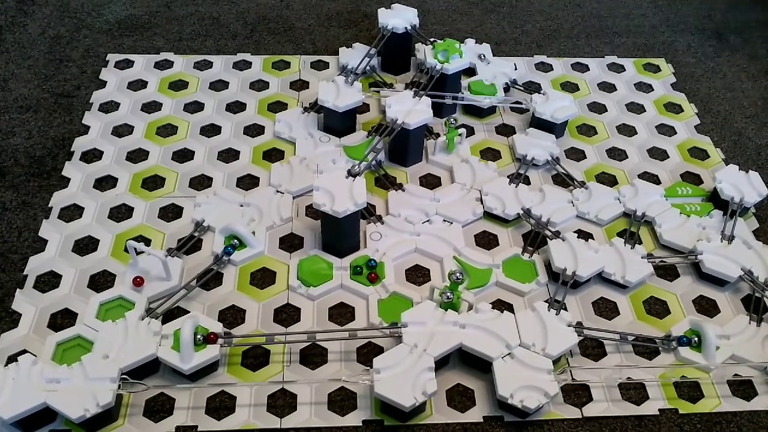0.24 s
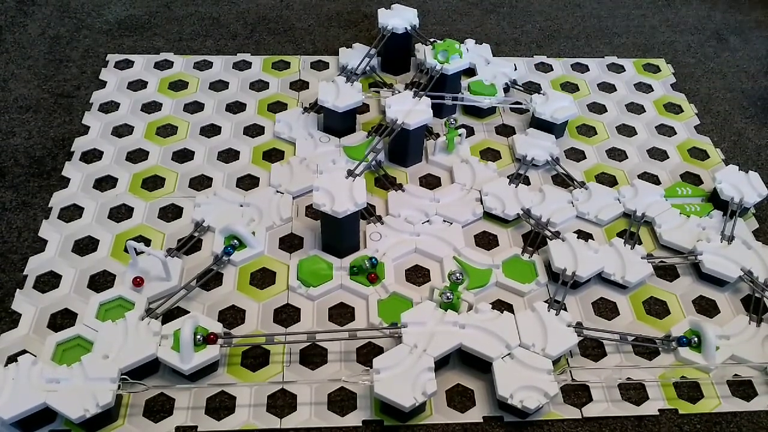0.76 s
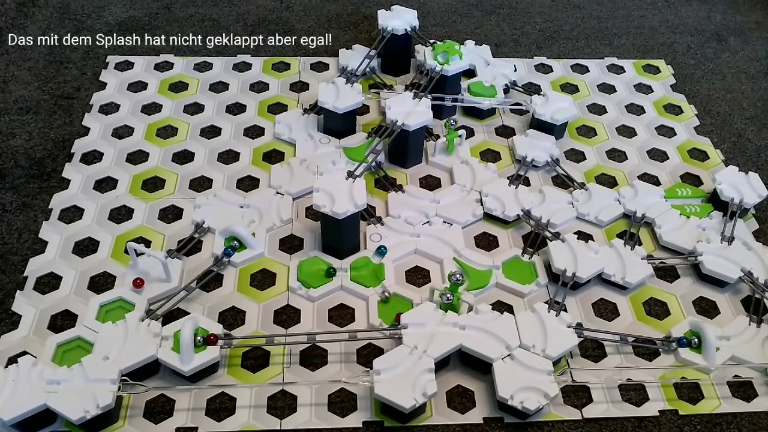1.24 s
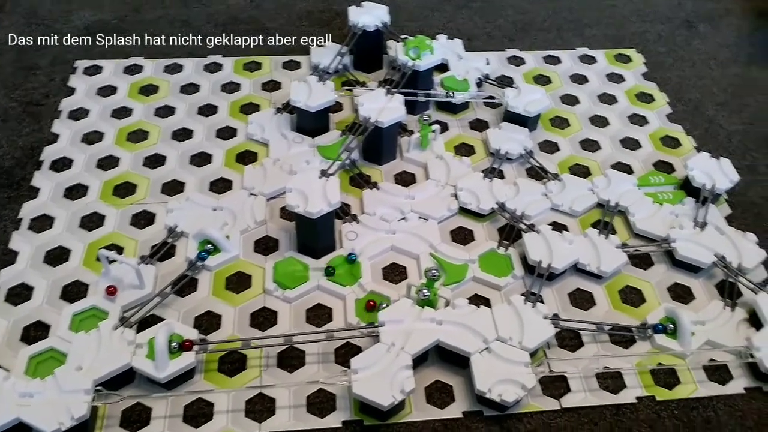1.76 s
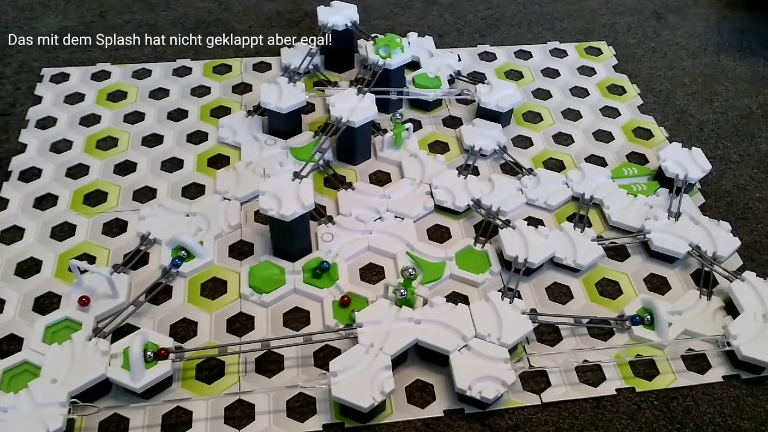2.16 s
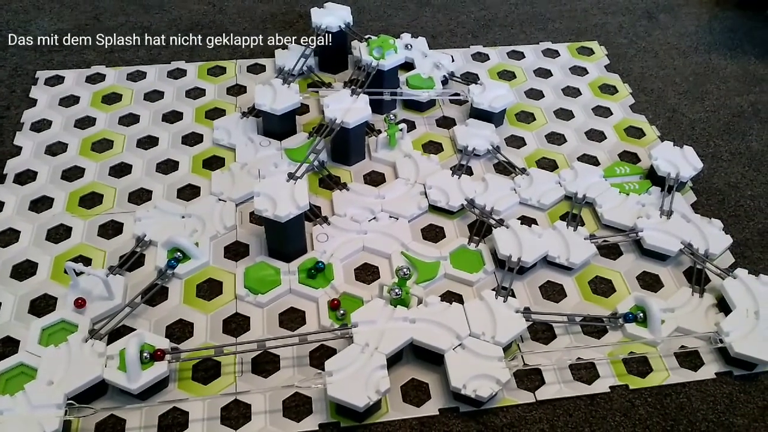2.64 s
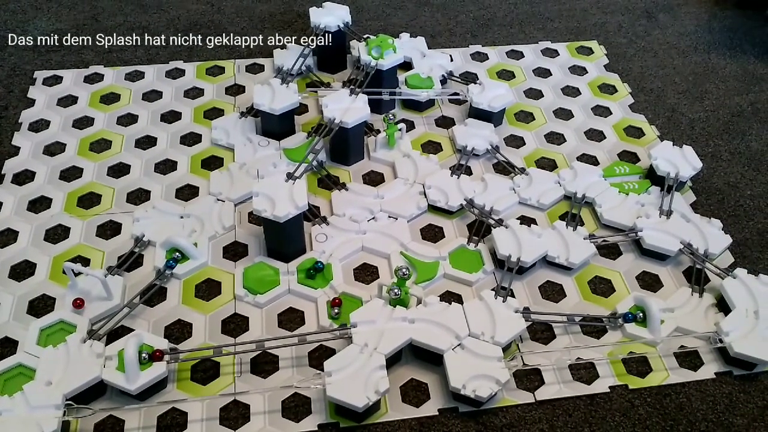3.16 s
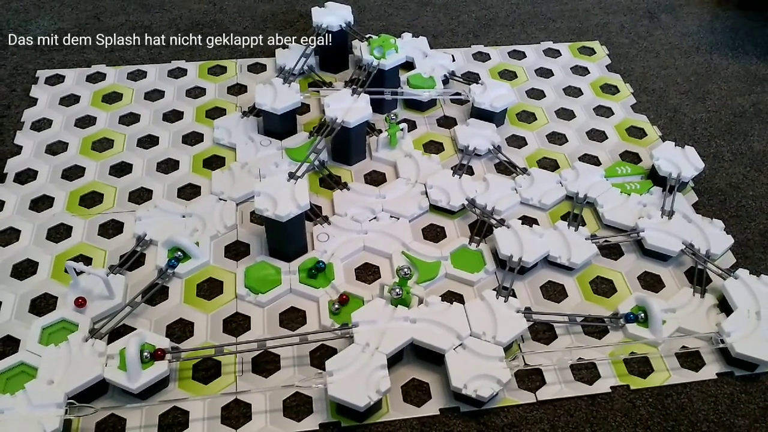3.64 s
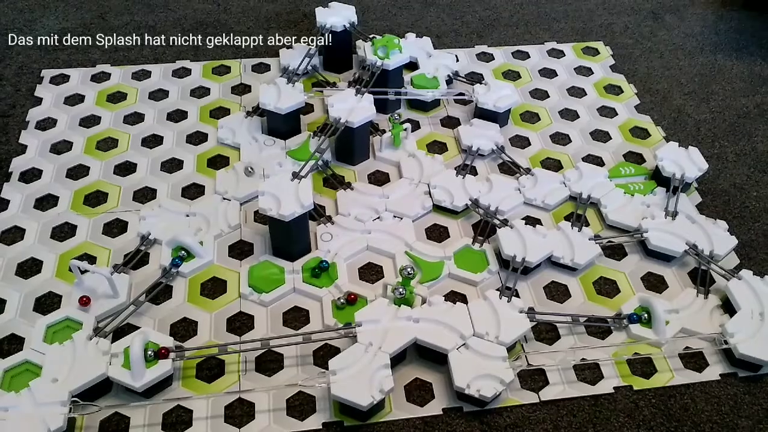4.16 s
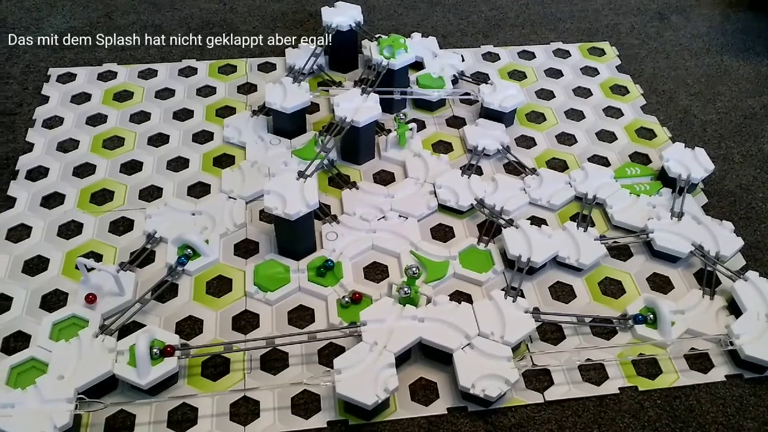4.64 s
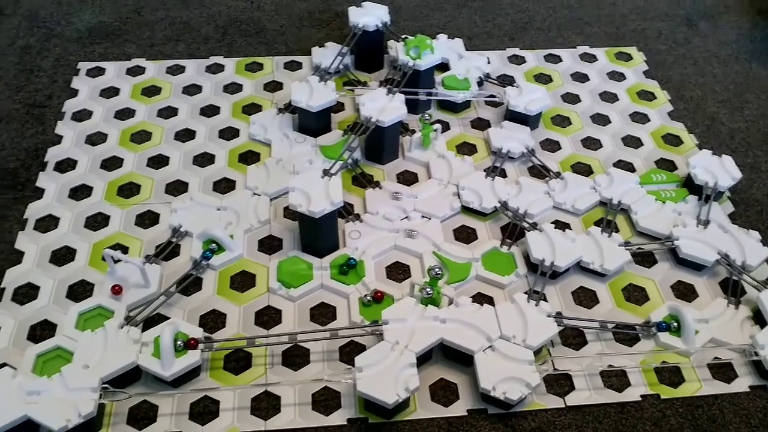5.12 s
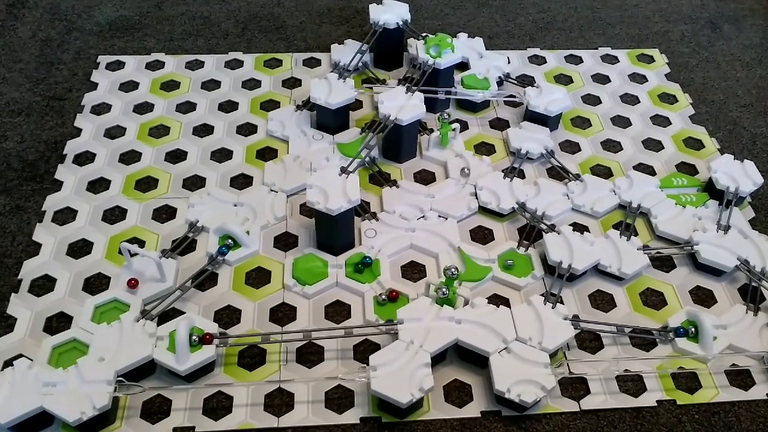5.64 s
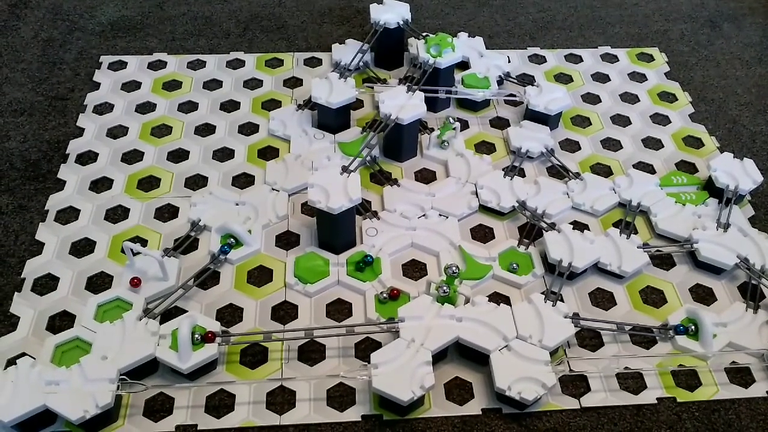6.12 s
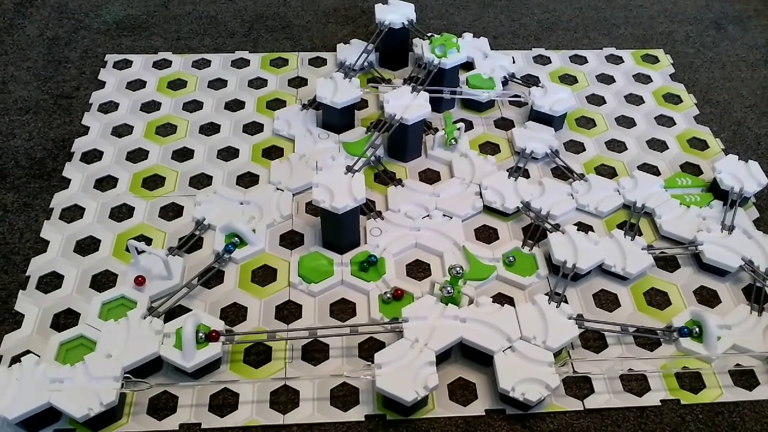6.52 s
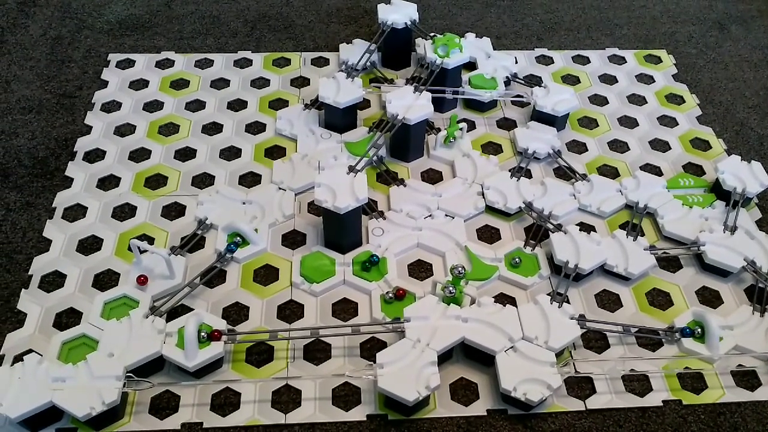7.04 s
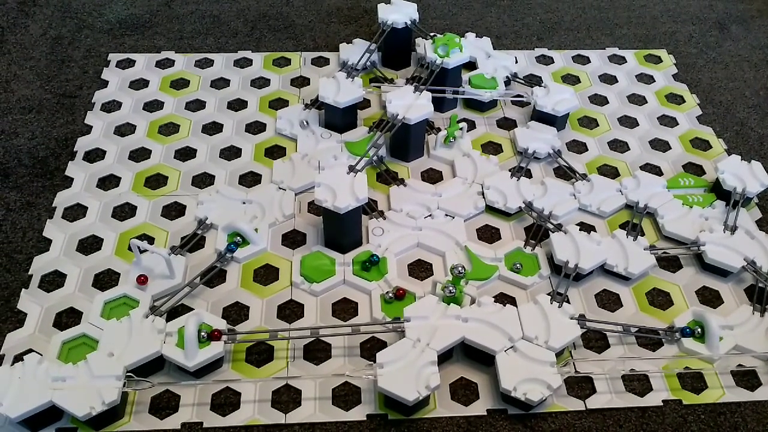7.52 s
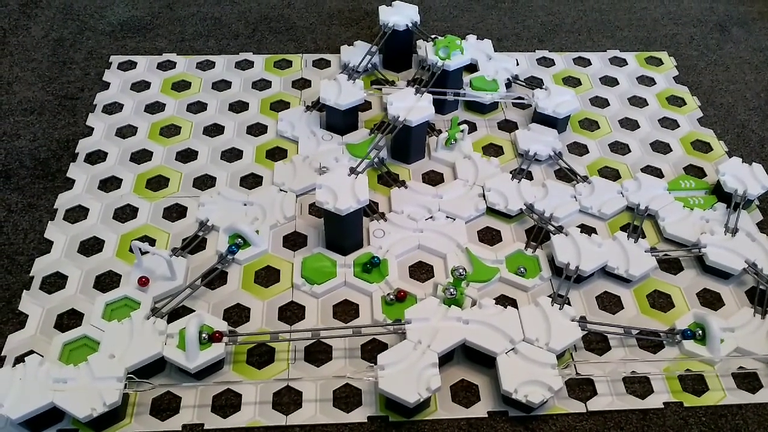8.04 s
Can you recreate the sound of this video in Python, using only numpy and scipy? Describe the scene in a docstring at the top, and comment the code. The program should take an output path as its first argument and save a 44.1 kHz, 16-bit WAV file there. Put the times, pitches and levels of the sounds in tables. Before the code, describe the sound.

Small steel marbles clack, tick and rattle through a hard plastic track on a carpeted floor, with short gaps and a few loud knocks.

```python
"""On a carpeted floor, steel marbles run through a plastic tile-and-rail track.
Knocks on joints and catchers are short contact bursts driving decaying modes; soft pushes thump the base.
Rolling is random ticks, a few pieces hum from noise, and a small pivot squeaks as wavering sines.
The room answers with echoes and a tail. It is heard through a phone, whose noise suppressor cuts
quiet tails short, over filtered noise for the low room rumble and faint hiss."""
import sys
import numpy as np
from scipy import signal
from scipy.fft import rfft, irfft, next_fast_len
from scipy.io import wavfile
from scipy.ndimage import uniform_filter1d

SR = 44100
rng = np.random.default_rng(int(sys.argv[2]) if len(sys.argv) > 2 else 0)


def undo_db(level):
    """Turn decibels back into plain size, where 20 dB means ten times bigger."""
    steps = np.asarray(level, float) / 20
    return 10 ** steps


def file_out(sig):
    """Save sig as 16-bit WAV at sys.argv[1]."""
    # one column per channel
    cols = np.atleast_2d(sig).T
    # limit, then scale
    lim = np.clip(cols, -1, 1)
    pcm = np.round(lim * 32767).astype(np.int16)
    wavfile.write(sys.argv[1], SR, pcm)


N = 365148

# modes of the hollow base plate: f/Hz, t60/s when struck, relative level/dB
BASE_MODES = [(250, 0.012, -3), (330, 0.00077, -2), (532, 0.022, -3.5), (587, 0.017, 3.5),
              (761.6, 0.016, 5.5), (970, 0.025, -2.5)]
# modes of the plastic tiles: f/Hz, t60/s when struck, relative level/dB
TILE_MODES = [(1370, 0.0047, -2), (1484, 0.003, 2.5), (1637, 0.0088, -3), (1920, 0.0042, -6.5),
              (1967, 0.014, -10.5)]
# modes of the rails: f/Hz, t60/s when struck, relative level/dB
RAIL_MODES = [(2650, 0.0024, -9.5), (3240, 0.007, -13.5), (3500, .006, -15), (4360, 0.0039, -6.5),
              (5100, 0.0022, -1), (6200, 0.0035, -10.5), (6450, 0.0062, -11)]
# bright steel ticks: f/Hz, t60/s when struck, relative level/dB
STEEL_MODES = [(7560, 0.0019, 9), (10160, 0.00082, 10), (11770, 0.00094, 9), (12600, 0.004, -1.5),
               (14300, 0.003, -2.5)]


def rms_one(x):
    """Scale to unit rms."""
    return x / np.sqrt(np.mean(x ** 2) + 1e-20)


def at_hz(points, hz):
    """Read a table on a log-frequency axis."""
    table_hz, value = np.transpose(points)
    return np.interp(np.log(hz), np.log(table_hz), value)


def ring(force, hz, t60):
    """A force sets a decaying sine ringing; small parts radiate nothing far below their pitch."""
    r, w = undo_db(-60 / (t60 * SR)), 2 * np.pi * hz / SR
    return signal.lfilter([.5, 0, -.5], [1, -2 * r * np.cos(w), r * r], force + 1e-18)


def drift(rate_hz):
    """Slow chance with spread 1: smoothed noise on 40 knots per second."""
    knots = rng.standard_normal(int(N / SR * 40) + 2)
    r = np.exp(-2 * np.pi * rate_hz / 40)
    smooth = rms_one(signal.lfilter([1], [1, -r], knots))
    return np.interp(np.arange(N) / SR * 40, np.arange(len(knots)), smooth)


def glide(x, depth, rate_hz):
    """Pitches waver slowly by the share depth, as the marble moves along a piece."""
    at = np.arange(N) + np.cumsum(depth * drift(rate_hz))
    return np.interp(at % (N - 1), np.arange(N), x)


def swell(start, length):
    """Rounded rise and fall, silent outside its span in seconds."""
    t = np.arange(N) / SR
    return np.sin(np.pi * np.clip((t - start) / length, 0, 1)) ** .5


def knocks():
    """Snap and chatter of contacts drive the modes, hardest near the brightest ring; returns direct, diffuse."""
    # knocks: t/s, drive level/dB, tile share/dB, brightest ring f/Hz, steel share/dB
    hits = [(0.08,-52.5,-11,3340,-9),(0.294,-43,-7,8510,-9),(.322,-39,-18,11400,-6.5),(0.334,-32.5,-4,7530,-49),(0.41,-35.5,-2.5,4350,-8.5),(.841,-13,-7,2800,-8),(0.872,-23,-8.5,3420,-14),(.906,-18.5,-17,2720,-19),(1.06,-51,-6,5570,-19),(1.085,-53,-6,2900,-26),(1.149,-39,-6,2680,-17),(1.289,-42.5,-14,2860,-13.5),(1.311,-32.5,-16.5,3000,-39),(1.355,-41,-29,2560,-16),(1.411,-36.5,-10.5,2615,-18),(1.45,-50.5,-47,10200,-3),(1.571,-49,-6,2540,-32.5),(1.683,-46,-18,2560,-62),(1.737,-46.5,-14,2510,-60),(1.864,-48.5,-11,2760,-59),(2.04,-40,-10,2207,-12.5),(2.317,-38,-10,9140,-7.5),(2.5,-50,-6,5600,-3),(2.575,-52,-22,5600,-3.5),(2.625,-49.5,-23,5760,-6.5),(2.674,-32.5,-6.5,5840,-15),(2.787,-41.5,4,2900,-9),(2.803,-40,-18,5070,-27),(2.816,-36,-27.5,8900,-5.5),(3.252,-51,-2.5,3900,-12.5),(3.343,-56.5,0,4900,-5.5),(3.434,-42.5,-8,7000,-17),(3.47,-23.5,-8.5,3720,-27),(3.629,-41,-4.5,8000,-16.5),(3.687,-48,-8.5,4800,-13),(3.814,-35,-8,6360,-14),(3.896,-40,-3,2520,-8.5),(3.936,-37.5,-3.5,6000,-12.5),(4.153,-54.5,6,2570,-35),(4.304,-25,-13,3560,-24),(4.477,-46.5,0,5000,-11),(4.602,-54.5,-5,5200,-6.5),(4.674,-41.5,-3.5,5350,-9),(4.765,-35.5,-41,5940,-16),(4.799,-37.5,-7,2570,-11.5),(4.9,-37.5,-42,2990,-17),(5.08,-32.5,-17,2680,-18),(5.117,-28,-19.5,2850,-64),(5.146,-31,-32,2880,-21.5),(5.318,-28.5,-5.5,2820,-22),(5.37,-40.5,-10,6500,-15.5),(5.501,-36.5,-6,6250,-57),(5.575,-41.5,-4,2830,-18),(5.698,-31.5,-10,2870,-20),(5.831,-37,-16,2820,-10),(5.848,-30,-11.5,3240,-69),(5.888,-38.5,-31,2850,-19),(5.971,-15,-21,3610,-24),(6.029,-50,-30,7800,-8.5),(6.168,-46,-15.5,2790,-48),(6.285,-45,-1.5,6620,-18),(6.318,-14,-12.5,3680,-14.5),(6.448,-34.5,-9.5,3430,-14),(6.479,-29,-15,3190,-18.5),(6.519,-33.5,-7,3240,-25),(6.648,-54,5.5,6000,-49),(6.676,-39.5,-37,6450,-40),(6.746,-41,-3.5,3700,-24),(6.801,-39.5,-36,4050,-26),(6.823,-37.5,-15,3710,-30),(6.906,-47,-1,3320,-33),(7.027,-41,-15,4160,-29),(7.11,-44.5,-15.5,3450,-13.5),(7.408,-49,-15,4640,-35),(7.475,-42.5,-25.5,3505,-39),(7.655,-50.5,6,5700,-35),(7.854,-43,2.5,2810,-42),(7.915,-45.5,-13.5,3230,-21.5),(8.086,-64,10.5,4540,-58)]
    rise_s, chatter_s, settle_s, snap = 0.00059, 0.0018, 0.006, 2.2
    s, drive_db, tile_db, bright_hz, steel_db = np.transpose(hits)
    # the duller a knock, the more it drives the hollow base; the heaviest blows shake it more still
    base_db = np.maximum(-21 - 27.5 * np.log2(bright_hz / 2290), -35)
    base_db = base_db + 3.9 * np.maximum(drive_db + 15.5, 0)
    modes = BASE_MODES + TILE_MODES + RAIL_MODES + STEEL_MODES
    chance_db = rng.normal(0, 1.5, (len(s), len(modes)))

    steps = np.arange(600)
    contact = np.exp(-steps / (chatter_s * SR)) * (1 - np.exp(-(steps / (rise_s * SR)) ** 2))
    chatter = rng.standard_normal((len(s), len(modes), len(steps))) * contact
    chatter /= np.sqrt(np.sum(chatter ** 2, axis=2, keepdims=True))
    chatter[:, :, np.argmax(contact)] += snap * (-1) ** np.arange(len(modes))
    chatter *= 1.95 / np.hypot(1, snap)
    # toward the walls the whole loose track radiates, rattling a little longer
    settle = rng.standard_normal(chatter.shape) * np.exp(-steps / (settle_s * SR))
    settle *= 1.526 / np.sqrt(np.sum(settle ** 2, axis=2, keepdims=True))

    at = np.minimum((s * SR).astype(int)[:, None] + steps, N - 1)
    shares = [base_db] * len(BASE_MODES) + [tile_db] * len(TILE_MODES)
    shares += [0 * s] * len(RAIL_MODES) + [steel_db] * len(STEEL_MODES)
    # weak knocks are far away: more room against direct sound
    to_room = undo_db(0.17 * (drive_db.max() - drive_db))[:, None]
    out = np.zeros((2, N))
    for k, (hz, t60, level_db) in enumerate(modes):
        octaves = np.log2(hz / bright_hz)
        near_db = 5.5 * np.exp(-(octaves / 0.21) ** 2)
        if (hz, t60, level_db) in RAIL_MODES:  # a dull knock loses rail modes above its brightest ring
            near_db = near_db + 0.84 * np.minimum(steel_db + 6.5, 0) * np.clip(octaves, 0, 1)
        push = undo_db(drive_db + shares[k] + level_db + near_db + chance_db[:, k])[:, None]
        force = np.zeros((2, N))
        np.add.at(force[0], at, push * chatter[:, k])
        np.add.at(force[1], at, push * settle[:, k] * to_room)
        out += ring(force, hz, t60)

    # each struck piece also rings at its brightest pitch, losing 60 dB in 80 cycles
    t = np.arange(SR // 20) / SR
    pitch = bright_hz[:, None]
    own_db = np.minimum(drive_db, -21.5)[:, None] - 10  # harder blows add clatter, not ring
    own = undo_db(own_db - 60 * t * pitch / 80) * np.sin(2 * np.pi * pitch * t) * (1 - np.exp(-t / rise_s))
    at = np.minimum(at[:, :1] + np.arange(len(t)), N - 1)
    np.add.at(out[0], at, own)
    np.add.at(out[1], at, own)
    return out


def thuds():
    """A soft push sets the base plate or a tile thumping."""
    # thumps: t/s, drive level/dB, f/Hz
    thumps = [(0.332,-30.5,1800),(0.409,-34.5,1774),(0.62,-46.5,1550),(0.843,-36.5,222),(0.906,-27.5,557),(1.06,-35.5,322),(1.15,-39.5,518),(1.413,-40,550),(1.572,-52.5,602),(1.748,-41,292),(1.8,-52.5,585),(2.05,-45,625),(3.127,-49.5,1280),(3.964,-41,1800),(5.999,-43.5,388),(5.18,-45,288),(5.7,-42,512),(6.283,-36.5,325),(6.289,-34.5,627),(6.318,-36.5,328)]
    t60, push_s = 0.03, 0.005
    out, steps = np.zeros(N), np.arange(int(push_s * SR))
    for s, drive_db, hz in thumps:
        force = np.zeros(N)
        push = np.sin(2 * np.pi * hz * steps / SR) * np.hanning(len(steps))
        force[int(s * SR) + steps] = undo_db(drive_db) * push
        out += ring(force, hz, t60) * 2.8 / len(steps)
    return out


def run_levels():
    """Each run swells, sinks a little as the marble slows and dies away; gains for tile, base and rail."""
    # runs over track: start t/s, length/s, relative tile rattle/dB, base drone/dB, rail hiss/dB
    runs = [(0,0.02,-52.5,-70.5,-50),(0.106,0.099,-66,-87,-68),(0.251,0.34,-58,-71.5,-60.5),(0.857,0.16,-55,-71,-55.5),(1.155,0.25,-92,-62.5,-82),(1.697,0.36,-71,-72,-70),(2.334,0.042,-53.5,-90,-58),(2.42,0.4,-58.5,-87,-63.5),(2.9,0.38,-69.5,-76,-78),(3.359,1,-57,-82,-57),(3.839,0.29,-54.5,-59,-87),(4.149,0.9,-55,-69,-58),(4.674,0.1,-52,-56,-57),(4.963,0.074,-55,-54,-60.5),(5.127,0.15,-51.5,-54,-70.5),(5.397,0.093,-60.5,-55.5,-78),(5.681,0.21,-82,-59,-85),(6.34,0.27,-55,-69,-57.5),(6.627,0.34,-54.5,-88,-59),(7.497,0.42,-57,-60,-68),(8.097,0.16,-71,-78.5,-93)]
    rise, slowing, fall = 461, 2, 217  # dB per s
    start, length, *levels_db = np.transpose(runs)[:, :, None]
    t = np.arange(0, N + 64, 64) / SR
    since = t - start
    shape_db = rise * np.minimum(since, 0) - slowing * np.maximum(since, 0)
    shape_db = shape_db - fall * np.maximum(since - length, 0)
    gains = []
    for db in levels_db:
        total = np.sqrt(np.sum(undo_db(2 * (db + shape_db)), axis=0))
        gains.append(np.interp(np.arange(N) / SR, t, total))
    return gains


def rolling():
    """Roughness under the marbles: clumped ticks into the track's modes, which change from tile to tile."""
    tile, base, rail = run_levels()
    chance = 750 * undo_db(3.5 * drift(8.3)) / SR  # about 750 ticks per s, in clumps
    parts = ((TILE_MODES, tile), (BASE_MODES[2:], base), (RAIL_MODES, rail),
             (STEEL_MODES, rail * undo_db(-11.0)))
    out = 0
    for modes, level in parts:
        size_db = 5.3 * np.minimum(rng.exponential(1, N), 4)
        ticks = (rng.random(N) < chance) * undo_db(size_db) * rng.choice([-1, 1], N)
        part = 0
        for k, (hz, t60, db) in enumerate(modes):
            # slow contacts excite the lower modes of each part most
            mode_db = db - 8.5 * np.log2(hz / modes[0][0]) + 5 * drift(9.4)
            tone = glide(ring(ticks, hz, t60 * 1.3), depth=.08, rate_hz=2.5)
            part = part + undo_db(mode_db) * tone * (-1) ** k
        out = out + level * rms_one(part)
    return undo_db(-7.5) * out


def hums():
    """Fine roughness under a slow marble drives a single mode: a narrow, unsteady tone."""
    # humming pieces: start t/s, length/s, f/Hz, level/dB
    tones = [(0.203,0.35,1734,-62.5),(0.422,0.36,1455,-71),(3.048,0.25,1350,-73.5),(3.092,0.31,4130,-83),(7.646,0.11,5480,-79),(8.068,0.092,4720,-76),(8.077,0.29,2950,-79.5),(8.142,0.18,1314,-65.5),(8.169,0.17,655,-76)]
    out = 0
    for start, length, hz, level_db in tones:
        tone = rms_one(ring(rng.standard_normal(N), hz, t60=.028))
        out = out + undo_db(level_db) * swell(start, length) * tone
    return out


def squeaks():
    """Stick-slip in a pivot: a wavering tone with its octave."""
    # squeaks: start t/s, length/s, f/Hz, pitch waver/Hz, level/dB, octave's relative level/dB
    chirps = [(2.498, 0.044, 5600, 250, -62, -27.5), (2.563, 0.2, 5700, 250, -64, -20),
              (6.279, 0.046, 6730, 250, -47.5, -8.5), (6.645, 0.021, 6460, 31.1, -49, -27)]
    out, waver = 0, rms_one(uniform_filter1d(rng.standard_normal(N), size=30))
    for start, length, hz, waver_hz, level_db, octave_db in chirps:
        phase = 2 * np.pi * np.cumsum(hz + waver_hz * waver) / SR
        tone = np.sin(phase) + undo_db(octave_db) * np.sin(2 * phase)
        out = out + undo_db(level_db) * swell(start, length) * tone
    return out


def room(direct, diffuse):
    """A few distinct reflections, then a diffuse tail that dies band by band."""
    # room decay: f/Hz, t60/s
    decay = [(200, 0.93), (530, 0.57), (1400, 0.4), (3700, 0.38), (9700, 0.29), (15000, 0.36)]
    # first reflections: delay/s, level/dB
    reflections = [(0.0112, -14), (0.016, -13.5), (0.0226, -17)]
    t = np.arange(SR // 2) / SR
    edges, reply = 100 * 2 ** np.arange(0, 7.6, .5), 0
    for low, high in zip(edges, edges[1:]):
        half_octave = signal.butter(2, [low, high], "band", fs=SR, output="sos")
        band = signal.sosfilt(half_octave, rng.standard_normal(len(t)))
        reply = reply + band * undo_db(-60 * t / at_hz(decay, np.sqrt(low * high)))
    reply = reply * (1 - np.exp(-(t / 0.0029) ** 2))  # the tail builds up over about 3 ms
    reply = undo_db(-3.5) * reply / np.sqrt(np.sum(reply ** 2))
    echoes = sum(undo_db(db) * np.roll(direct, round(delay * SR)) for delay, db in reflections)
    return echoes + signal.fftconvolve(diffuse, reply)[:N]


def air():
    """Noise coloured as room rumble and microphone hiss; it wanders in level, its upper rumble more."""
    # noise colour: f/Hz, relative level/dB
    colour = [(15, -60), (35, -20.5), (60, -1), (110, 2), (170, 0), (300, -7), (420, -30.5), (700, -37),
              (8000, -41), (10000, -54), (15000, -57.5)]
    size = next_fast_len(N)
    hz = np.maximum(np.fft.rfftfreq(size, 1 / SR), 1)
    spectrum = rfft(rng.standard_normal(size)) * undo_db(at_hz(colour, hz))
    steady = rms_one(irfft(spectrum, size)[:N])
    upper_band = signal.butter(2, [200, 500], "band", fs=SR, output="sos")
    upper = signal.sosfiltfilt(upper_band, steady)
    noise = steady - upper + upper * undo_db(3.5 * drift(4) - 7.5)
    return undo_db(-71.5 + 2.4 * drift(5)) * noise


def scene():
    """Track sounds and their room."""
    direct, diffuse = knocks()
    thump = thuds()
    direct, diffuse = direct + thump, diffuse + undo_db(-8.0) * thump
    rest = squeaks() + hums() + rolling()
    return (direct + rest + room(direct, diffuse + rest))[None]


def suppress(x):
    """Noise suppressor: bands whose recent power nears the threshold are turned down, by 18.5 dB at most."""
    # suppressor threshold: f/Hz, level of a spectral band/dB
    threshold = [(300, -100), (700, -90), (1500, -90.5), (2800, -101), (4500, -90), (9000, -100),
                 (12000, -86.5), (15000, -84)]
    memory = 0.43  # share of the smoothed power kept from one frame to the next
    hz, _, z = signal.stft(x, SR, nperseg=1024, noverlap=768)
    power = uniform_filter1d(abs(z) ** 2, 2, axis=-2)
    power = signal.lfilter([1 - memory], [1, -memory], power, axis=-1)
    limit = undo_db(2 * at_hz(threshold, np.maximum(hz, 1)))[:, None]
    gain = np.maximum(1 - limit / (power + 1e-20), undo_db(-18.5))
    return signal.istft(z * gain, SR, nperseg=1024, noverlap=768)[1][..., :N]


def roll_off(x):
    """The treble ends steeply here."""
    return signal.sosfilt(signal.butter(12, 16530, fs=SR, output="sos"), x)


def record(dry):
    """The phone cuts bass and top and suppresses noise; steady rumble and hiss remain."""
    dry = signal.sosfilt(signal.butter(2, 140, "high", fs=SR, output="sos"), dry)
    dry = signal.sosfilt(signal.butter(6, 15500, fs=SR, output="sos"), dry)
    mix = suppress(dry) + air()
    return roll_off(mix)


dry = scene()
out = record(dry)
file_out(out)
```